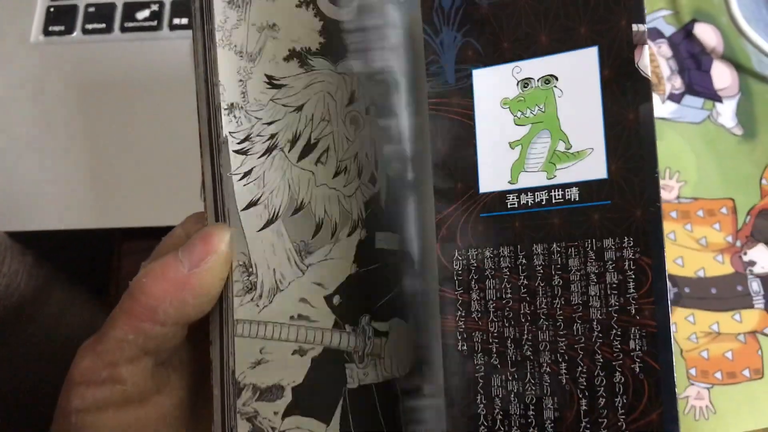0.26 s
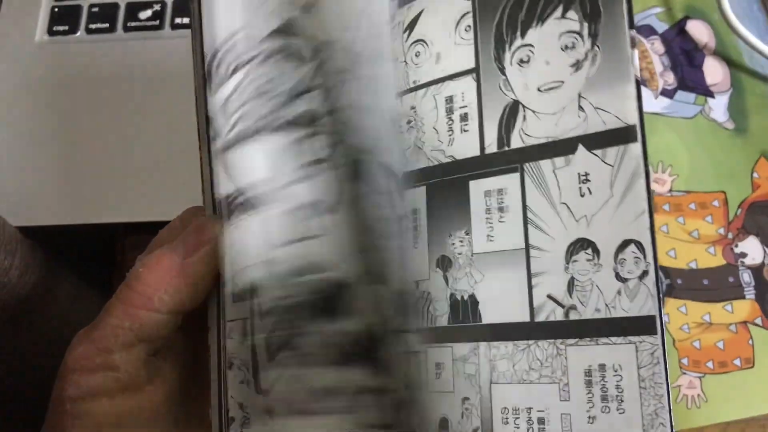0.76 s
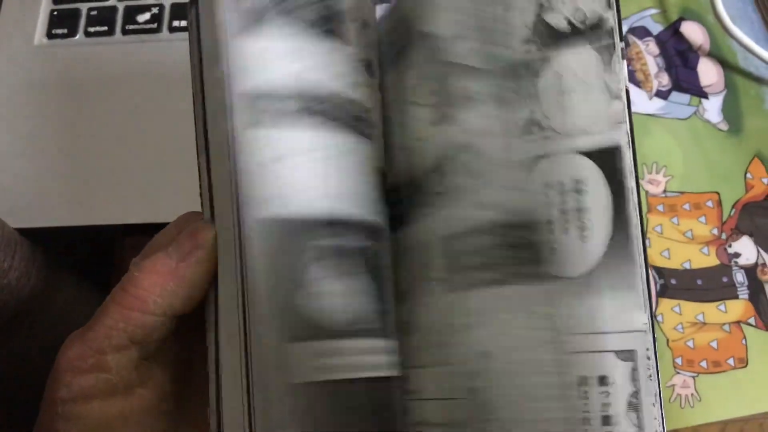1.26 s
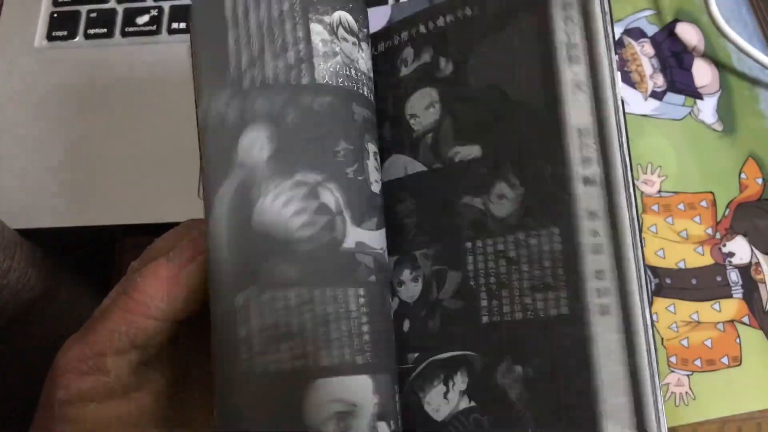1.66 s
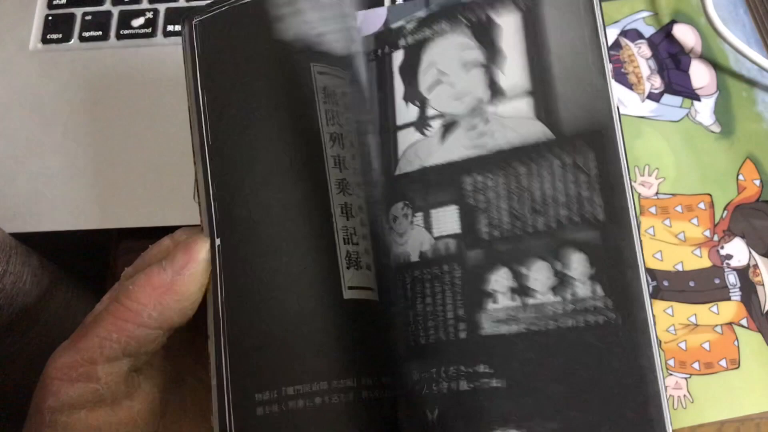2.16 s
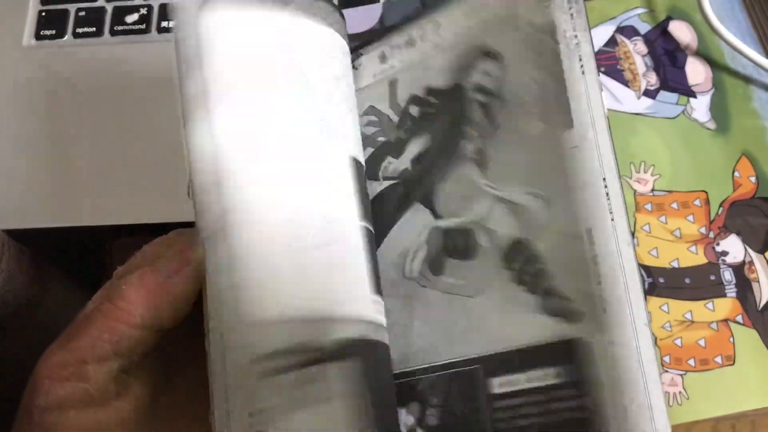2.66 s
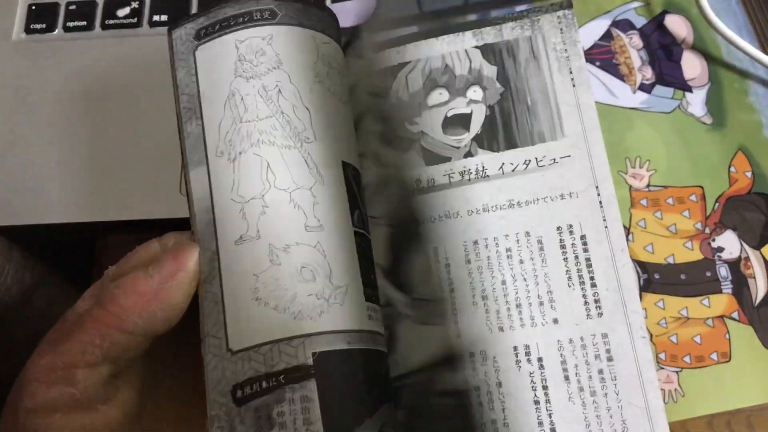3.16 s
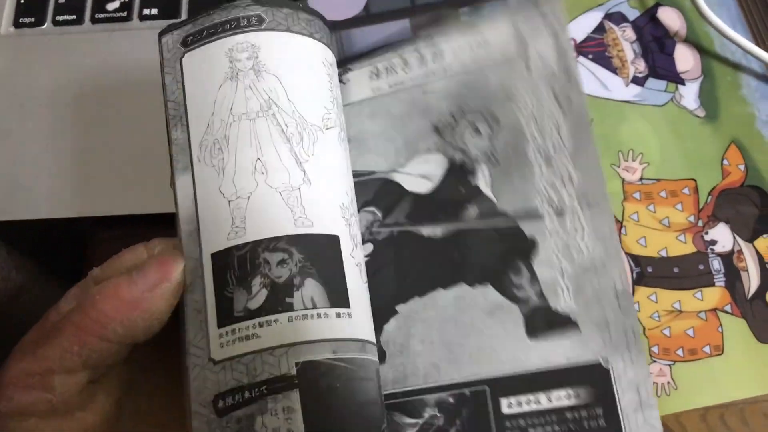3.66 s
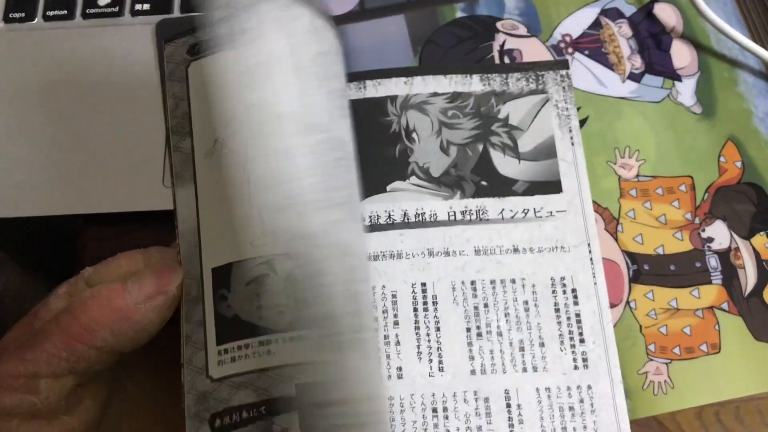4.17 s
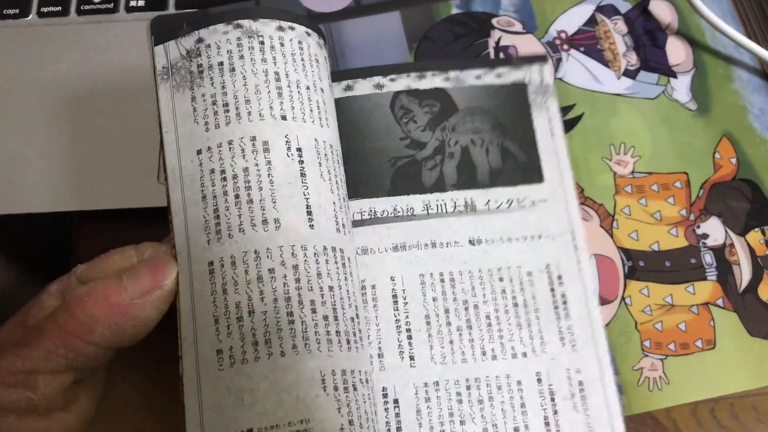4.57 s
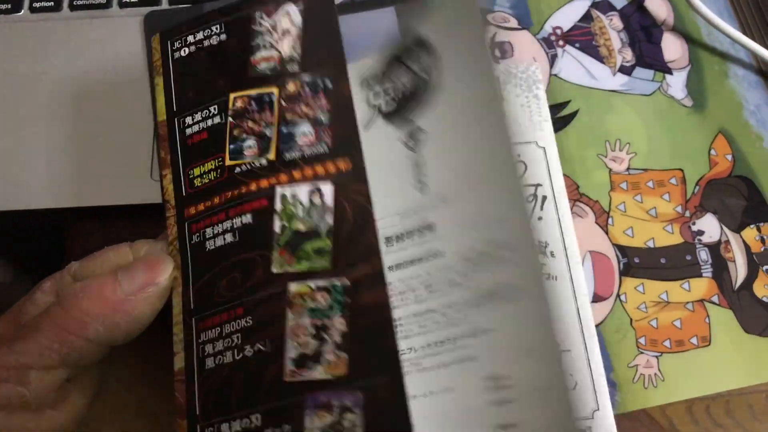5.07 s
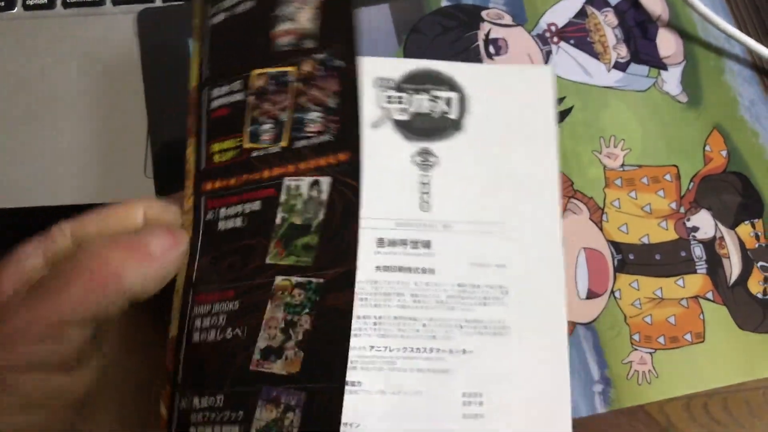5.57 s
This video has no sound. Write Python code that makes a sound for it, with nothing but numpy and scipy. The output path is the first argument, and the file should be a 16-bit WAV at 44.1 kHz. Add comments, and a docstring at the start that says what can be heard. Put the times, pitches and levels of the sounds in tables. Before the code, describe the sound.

Close to the microphone in a small quiet room, the pages of a thin booklet slip off a thumb in a quick, uneven run of light scrapes and flicks. The flicks gradually grow sparser and softer, then a stiff glossy leaf slides with a brief hiss. Near the end the cover snaps loudly against a desk and bounces. Faint room hiss and hum lie underneath.

```python
"""Thumbing through a booklet

Pages of a thin booklet slip off a thumb one by one, close up, in a small quiet room.
Each edge scrapes onto the thumb, drags and flicks free; stiff glossy leaves slide with a longer hiss.
Cover and spine knock now and then; at the end the cover snaps against the desk and bounces.
Room air, fan hiss, mains hum and a faint electronic whine lie underneath."""
import sys
import numpy as np
from scipy import signal
from scipy.fft import rfft, irfft, next_fast_len
from scipy.io import wavfile
from scipy.ndimage import map_coordinates

SR = 44100
rng = np.random.default_rng(int(sys.argv[2]) if len(sys.argv) > 2 else 0)


def bounce(signal):
    """Save signal as a 16-bit WAV file at the path given by the first command-line argument."""
    frames = np.transpose(np.atleast_2d(signal))
    limited = np.clip(frames, -1, 1)
    pcm = np.round(limited * 32767).astype(np.int16)
    wavfile.write(sys.argv[1], SR, pcm)


N = 256662
LEAD_S = 1 / 8  # start of a scrape's buffer to its peak

# Friction spectrum of glossy paper. Each row: frequency in Hz, level in dB.
GLOSS_SPECTRUM = [(500, -20), (1500, -16), (2200, 0.5), (2650, -3), (2920, -7), (3400, -3), (4000, -5.5),
                  (6200, -1.5), (7600, -5), (9200, -6), (10400, -12.5), (12000, -9.5), (15500, -18)]


def pages(ring_width_hz=750, ring_db=-2, arch_fade_db_per_s=3, flap_db=-21):
    """Each page scrapes onto the thumb, drags, snaps free with a brief ring and flaps down."""
    # Each row: release in seconds, flick level in dB, hold on the thumb in ms, scrape level in dB,
    # body in dB, edge brightness in dB, sheet ring in Hz.
    flips = [(.0673, -62, 18, -50.5, 5, -5, 4500), (0.2454, -40.5, 7.5, -48, 0.5, 2.5, 4200),
             (0.364, -56, 0.9, -67, 4, -5, 4500), (.6349, -43.3, 11.8, -45.3, 4, 2.5, 5400),
             (0.649, -43, 19.5, -44, 0.5, -4, 3730), (.768, -41.5, 13.4, -44, 3.5, 1, 6130),
             (0.8066, -47, 1.2, -50, 6, 0.5, 3680), (0.9639, -55, 1.1, -69, 7, -1, 5800),
             (0.9781, -44.5, 1, -63, 1.5, 3, 6400), (0.9824, -41.5, 0.93, -52, 0, 2, 6200),
             (1.1794, -40, 19.2, -43.5, 1.5, -0.5, 5500), (1.255, -42, 35, -49.5, 2.5, -4, 6100),
             (1.296, -45.5, 0.88, -48.5, 4, 2, 2980), (1.3751, -43, 23, -48.5, 4.5, 0, 4870),
             (1.4108, -43.5, 12, -55, -2.5, -7, 5360), (1.4304, -40, 7.7, -51, -1.5, -2.5, 4930),
             (1.4528, -55, 0.93, -62, -2, -17, 3200), (1.5752, -44, 15.6, -43.5, -1, -0.5, 4370),
             (1.7342, -44, 22.5, -46.5, 3, -1.5, 5500), (2.0623, -45.5, 5.5, -51, 4.5, -0.5, 3970),
             (2.1018, -44.5, 27.3, -46.5, 0, -9, 3560), (2.1617, -45.5, 29, -57, 3.5, -2, 8600),
             (2.2693, -48, 19.5, -56.5, 1, 0, 4080), (2.4285, -44.5, 4.4, -58, 7, 3, 6400),
             (2.563, -44.5, 24, -57.5, -1.5, 2.5, 3600), (2.6945, -45.5, 28, -62, -1.5, -3, 5200),
             (2.8322, -41.5, 41, -62, -2.5, 0.5, 6770), (2.9445, -47.5, 19, -57, -1, 2, 5560),
             (3.128, -43, 22, -66, 4, 2.5, 5950), (3.389, -52.5, 5.2, -55, 4, 2, 6300),
             (3.542, -50, 6.8, -55.5, 8.5, 2, 4730), (3.7494, -48.5, 47, -62, -3, -1, 7850),
             (4.147, -55.5, 1.15, -62, 0, -7, 5800), (4.1548, -47.5, 2, -61, 2, 1.5, 4240),
             (4.3555, -57, 29, -64, 2, 1, 5800), (4.3664, -48.5, 0.89, -66, 3, -4, 5700),
             (4.7419, -48.3, 9.9, -59, 5, 0, 5760), (5.0065, -51.5, 29, -59.5, 3.5, -1, 6000),
             (5.6516, -53, 1, -61, 7, -2, 2900), (5.684, -50, 5, -49, 10, -3, 3100)]
    # Friction spectrum of a page. Each row: frequency in Hz, level in dB.
    paper_spectrum = [(200, -8), (600, -9), (1000, -3), (1380, -6), (1850, -4), (2600, -3), (4000, 0),
                      (6200, 0), (7600, -4), (8700, -1.5), (10300, -9.5), (12000, -5.5), (15500, -12)]
    # Resonance of the arched block of pages: centre in Hz, width in Hz, initial level in dB.
    arch_mode = (1384, 130, 7)
    # Pages let go faster as the block thins. Each row: time in seconds, flick length factor.
    flick_pace = [(0, 1.21), (4.8, .55)]
    arch_hz, arch_width_hz, arch_db = arch_mode
    out = np.zeros(N)
    for release_s, flick_db, hold_ms, scrape_db, body_db, edge_db, ring_hz in flips:
        arch = (arch_hz, arch_width_hz, arch_db - arch_fade_db_per_s * release_s)
        sheet = (ring_hz, ring_width_hz, ring_db)
        held = lambda f: amp(along(paper_spectrum, f)) * (1 + resonances([arch], f))
        free = lambda f: amp(along(paper_spectrum, f)) * (0.5 + resonances([arch, sheet], f))
        touch_ms = 7.5 + 0.18 * hold_ms
        drag_ms = 0.85 * hold_ms
        pace = np.interp(release_s, *np.transpose(flick_pace))
        touch = scrape(scrape_db, 0.83 * touch_ms, 1.32 * touch_ms, body_db - 1.5, edge_db, held,
                       grit_db=3)
        drag = scrape(scrape_db - 10.5, drag_ms, drag_ms, body_db, edge_db, held, grit_db=6)
        flick = scrape(flick_db, 5.95 * pace, 3.4 * pace, body_db - 2, edge_db, free, grit_db=5)
        snap = scrape(flick_db + 3, 1.3, 1.07, body_db - 2, edge_db + 5, free, grit_db=3.5)
        flap = air_puff(hz=150 * np.exp(0.29 * rng.standard_normal()), t60_s=0.044)
        hold_s = hold_ms / 1000
        add(out, release_s - hold_s - LEAD_S, touch)
        add(out, release_s - hold_s / 2 - LEAD_S, drag)
        add(out, release_s - LEAD_S, flick + snap)
        add(out, release_s, amp(flick_db + flap_db) * flap)
    return out


def scrape(level_db, rise_ms, fall_ms, body_db, edge_db, colour, grit_db):
    """Fibres catch and slip ever harder until the edge lets go. Rise and fall are per 20 dB."""
    t_ms = np.arange(-SR // 8, SR // 8) * 1000 / SR
    contact = np.clip((t_ms + rise_ms + 2) / 2, 0, 1)
    force = contact * amp(level_db - 20 * np.maximum(-t_ms / rise_ms, t_ms / fall_ms))
    signs = rng.choice([-1, 1], len(t_ms))
    grit = amp(grit_db * np.clip(rng.standard_normal(len(t_ms)), -3, 3))
    tilt_hz_db = [(1700, body_db), (3200, 0), (6000, 0), (9500, edge_db)]
    friction = filtered(force * signs * grit, lambda f: colour(f) * amp(along(tilt_hz_db, f)))
    return friction * np.linalg.norm(force) / np.linalg.norm(friction)


def air_puff(hz, t60_s):
    """Short low puff of air from a moving sheet."""
    t = np.arange(SR // 4) / SR
    return np.sin(2 * np.pi * hz * t) * amp(-60 * t / t60_s)


def cover_knocks(desk_max_hz=600, radiate_hz=740, crack_t60_s=0.023, slap_t60_s=0.0086):
    """Each blow rings cover and desk, cracks the paper and squeezes air from under the booklet."""
    # Each row: start in seconds, level in dB, contact cut-off in Hz, paper slap in dB, desk thud in dB.
    knocks = [(1.502, -55.5, 3500, -19, -12), (2.477, -53, 2000, 0, 0), (4.496, -53.5, 3000, 0, -8),
              (5.1818, -41.5, 1300, -26, -8), (5.1941, -48, 2000, -16, 5), (5.668, -48.5, 1310, -15, 0),
              (5.689, -14.8, 5800, -21, .7), (5.764, -35, 4000, 10, -11), (5.8125, -44, 900, -10, 8)]
    # Modes of the booklet on the desk. Each row: frequency in Hz, level in dB, t60 in seconds.
    modes = [(197, -25.5, 0.091), (233, -20.5, 0.09), (265, -17, 0.089), (334, -17, 0.11),
             (465, -12, 0.046), (904, -4.5, 0.035), (1010, -5, 0.035), (1162, 1, 0.014),
             (1290, -11.5, 0.031), (1506, -9.5, 0.034), (1730, -9.5, 0.015), (2100, -19, 0.01),
             (2940, -8.5, 0.025), (3940, -18, .012)]
    # Spectra of the paper's crack and slap. Each row: frequency in Hz, level in dB.
    crack_spectrum = [(60, -34), (200, 0), (600, 2), (1000, 10), (2500, -4.5), (5500, -6.5), (9000, -12),
                      (11000, -15), (15500, -18)]
    slap_spectrum = [(500, 1), (1500, -14), (2500, -4), (3000, 8), (3500, 1.5), (4200, 3), (4800, -11),
                     (7500, -20), (9000, -53), (15500, -51)]
    cover_modes = [mode for mode in modes if mode[0] > desk_max_hz]
    desk_modes = [mode for mode in modes if mode[0] <= desk_max_hz]
    # The small cover radiates little below its lowest mode.
    radiation = signal.butter(4, radiate_hz, "high", fs=SR)
    t = np.arange(SR // 4) / SR
    out = np.zeros(N)
    for start_s, level_db, contact_hz, slap_db, thud_db in knocks:
        cover = signal.lfilter(*radiation, amp(-0.1) * ringing(cover_modes, t, attack_s=0.00035))
        desk = amp(thud_db + 0.5) * ringing(desk_modes, t, attack_s=0.001)
        crack = noise(crack_spectrum, len(t)) * amp(-2 - 60 * t / crack_t60_s)
        soft_contact = signal.butter(1, contact_hz, "low", fs=SR)
        blow = signal.lfilter(*soft_contact, cover + desk + crack)
        slap = noise(slap_spectrum, len(t)) * amp(slap_db - 60 * t / slap_t60_s)
        puff = amp(level_db + thud_db - 20) * air_puff(hz=160, t60_s=0.034)
        add(out, start_s, amp(level_db) * (blow + slap))
        add(out, start_s + 0.0131, puff)  # as the booklet settles
    return out


def ringing(modes, t, attack_s):
    """Struck modes decay, their strengths slightly new at every blow."""
    ring = sum(amp(db + rng.normal(0, 1) - 60 * t / t60_s) * np.cos(2 * np.pi * hz * t)
               for hz, db, t60_s in modes)
    return ring * (1 - np.exp(-t / attack_s))


def sliding_leaves():
    """Glossy leaves hiss over each other with a slight ring."""
    # Each row: peak time in seconds, level in dB, rise and fall in ms per 20 dB, body in dB.
    slides = [(0.3757, -41.5, 8, 15, 2), (0.394, -41, 18, 20, -6), (0.407, -46, 21, 28, -5),
              (0.445, -55, 60, 32, -17), (5.057, -37, 30, 20, -8), (5.0744, -34.5, 31, 5, -6.5)]
    # Each row: centre in Hz, width in Hz, level in dB.
    leaf_modes = [(4500, 170, -1), (5900, 300, -4.5)]
    gloss = lambda f: amp(along(GLOSS_SPECTRUM, f)) * (1 + resonances(leaf_modes, f))
    out = np.zeros(N)
    for peak_s, *stroke in slides:
        add(out, peak_s - LEAD_S, scrape(*stroke, edge_db=0, colour=gloss, grit_db=2.5))
    return out


def finger_rub(rise_s=0.067, fall_s=0.17, hiss_floor_db=-85, grit_db=6, crackle_db=4):
    """A faint steady background hiss, plus a rustle of skin on paper at each shift of the grip."""
    # Each row: peak time in seconds, level in dB.
    grip_shifts = [(5.01, -61), (5.55, -70.5), (5.67, -60.5), (5.815, -66.5)]
    t = np.arange(N) / SR
    swells = sum(amp(db - 20 * np.maximum((peak_s - t) / rise_s, (t - peak_s) / fall_s))
                 for peak_s, db in grip_shifts)
    slips = rng.standard_normal(N) * amp(grit_db * rng.standard_normal(N) + crackle_db * wobble(150))
    rustle = unit(filtered(slips, lambda f: amp(along(GLOSS_SPECTRUM, f))))
    return rustle * np.hypot(amp(hiss_floor_db), swells)


def room_reverb(x, delay_s=0.005):
    """The walls return a short diffuse tail."""
    # Each row: frequency in Hz, t60 in seconds.
    decay_times = [(150, 0.22), (1000, 0.15), (4000, 0.13), (12000, 0.051)]
    hz, t, spectra = signal.stft(rng.standard_normal(SR // 2), SR, nperseg=256)
    decay = amp(-60 * t / along(decay_times, hz)[:, None])
    tail = signal.istft(spectra * decay, SR, nperseg=256)[1]
    delayed = np.pad(x, (round(delay_s * SR), 0))
    return signal.fftconvolve(delayed, tail / np.linalg.norm(tail))[:N]


def background(air_db=-64.5, fan_db=-78.5, whine_growth_s=4):
    """Room air, fan hiss, slightly unsteady mains hum and a thin whine that grows, then holds."""
    # Each row: frequency in Hz, level in dB.
    air_spectrum = [(25, -9), (35, -12), (48, 1.5), (80, 0), (120, -1.5), (160, -5.5), (210, -8.5),
                    (300, -6), (520, -9.5), (720, -6.5), (1050, -10.5), (1800, -15.5), (3500, -17),
                    (5200, -39), (10000, -36.5), (15500, -35)]
    # Each row: centre in Hz, width in Hz, level in dB before squaring.
    fan_bands = [(2980, 190, -1.5), (3940, 290, -0.5), (4450, 140, -1), (5840, 2200, -4)]
    # Each row: frequency in Hz, rms level in dB.
    hum_tones = [(59.2, -67.5), (216, -80), (649, -83.5)]
    whine_tones = [(2919.5, -77), (3029, -88), (3136, -82), (3353, -86)]
    t = np.arange(N) / SR
    air = noise(air_spectrum, N) * amp(air_db + 0.35 * wobble(6.41))
    fan_colour = lambda f: sum(abs(resonances([band], f)) ** 2 for band in fan_bands)
    fan = amp(fan_db) * unit(filtered(rng.standard_normal(N), fan_colour))
    hum = sum(amp(db + wobble(4.75)) * np.sin(2 * np.pi * hz * t + 0.33 * wobble(6))
              for hz, db in hum_tones)
    whine = sum(amp(db) * np.sin(2 * np.pi * hz * t + 0.17 * wobble(9.9)) for hz, db in whine_tones)
    growth = amp(np.interp(t, [0, whine_growth_s], [-4, 0]))
    return air + fan + np.sqrt(2) * (hum + growth * whine)


def amp(db):
    """Decibels to gain."""
    return 10 ** (np.asarray(db) / 20)


def unit(x):
    """Scale to rms 1."""
    return x / np.sqrt(np.mean(x ** 2) + 1e-20)


def along(points, hz):
    """Interpolate (Hz, value) points on a log frequency axis."""
    knots_hz, values = np.transpose(points)
    return np.interp(np.log(hz + 1), np.log(knots_hz + 1), values)


def filtered(x, response):
    """Apply a gain given as a function of Hz."""
    size = next_fast_len(len(x) + 4096)
    hz = np.fft.rfftfreq(size, 1 / SR)
    return irfft(rfft(x, size) * response(hz), size)[:len(x)]


def resonances(modes, f):
    """Summed complex response of resonators at f Hz."""
    return sum(amp(db) * 1j * f * width_hz / (hz * hz - f * f + 1j * f * width_hz)
               for hz, width_hz, db in modes)


def noise(spectrum, size):
    """Coloured noise of rms 1."""
    return unit(filtered(rng.standard_normal(size), lambda f: amp(along(spectrum, f))))


def wobble(knots_per_s):
    """Smooth random curve."""
    knots = rng.standard_normal(int(N * knots_per_s / SR) + 4)
    return map_coordinates(knots, [np.arange(N) * knots_per_s / SR])


def add(track, start_s, sound):
    """Mix a sound in, cropped to the track."""
    offset = round(start_s * SR)
    part = sound[max(-offset, 0):max(N - offset, 0)]
    first = max(offset, 0)
    track[first:first + len(part)] += part


def scene(paper_send_db=-20, knock_send_db=-17):
    """Close paper sounds, their reverb and the background, in mono."""
    paper = pages() + sliding_leaves() + finger_rub()
    knocks = cover_knocks()
    reverb = room_reverb(amp(paper_send_db) * paper + amp(knock_send_db) * knocks)
    return (paper + knocks + reverb + background())[None]


def record(dry, low_hz=38, top_hz=16000):
    """The microphone loses deep bass and cuts off steeply at its band limit."""
    thinned = signal.sosfilt(signal.butter(5, low_hz, "high", fs=SR, output="sos"), dry[0])
    return filtered(thinned, lambda f: 1 / np.sqrt(1 + (f / top_hz) ** 160))[None]


dry = scene()
out = record(dry)
bounce(out)
```